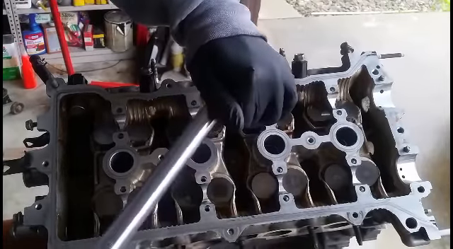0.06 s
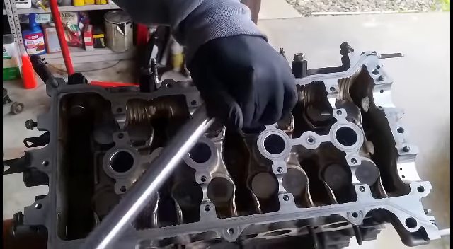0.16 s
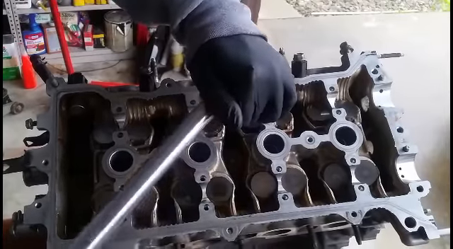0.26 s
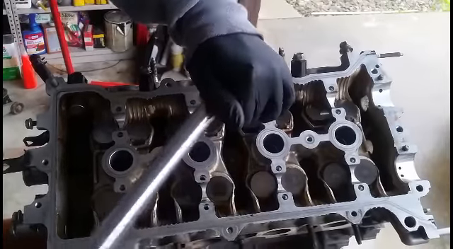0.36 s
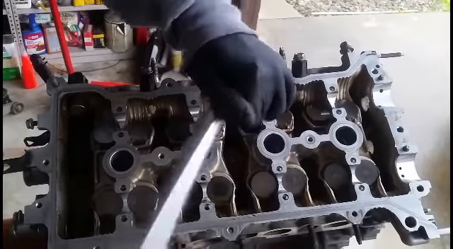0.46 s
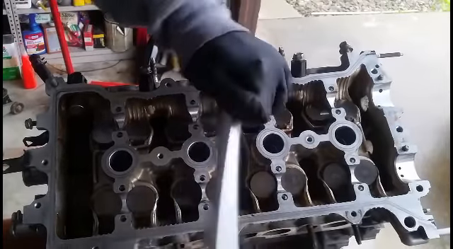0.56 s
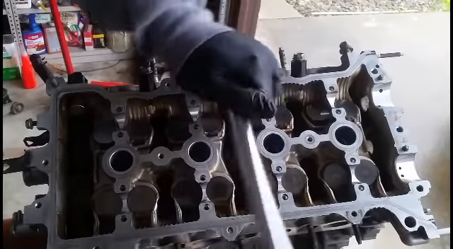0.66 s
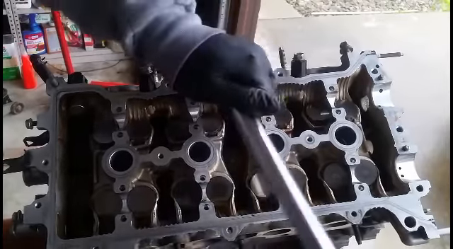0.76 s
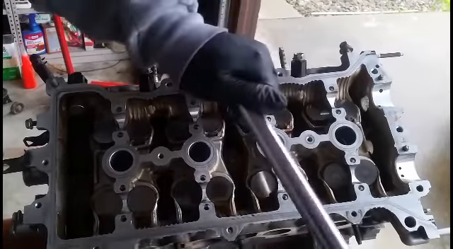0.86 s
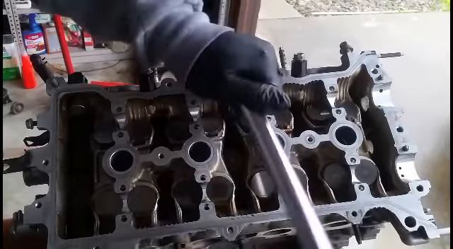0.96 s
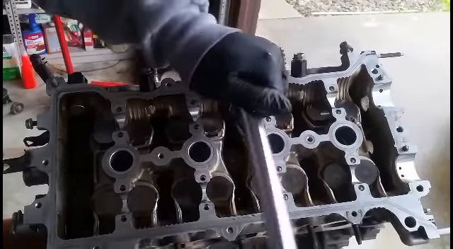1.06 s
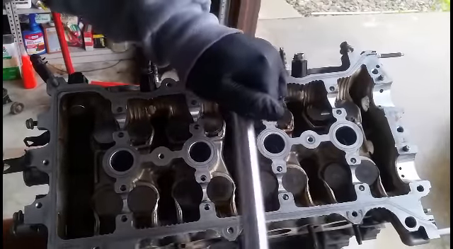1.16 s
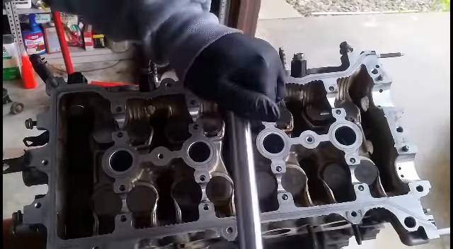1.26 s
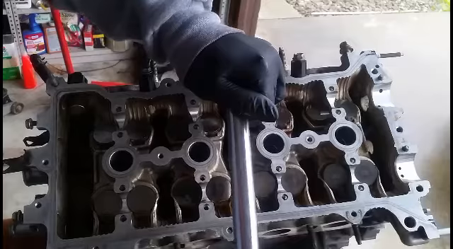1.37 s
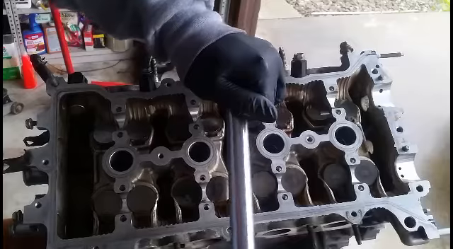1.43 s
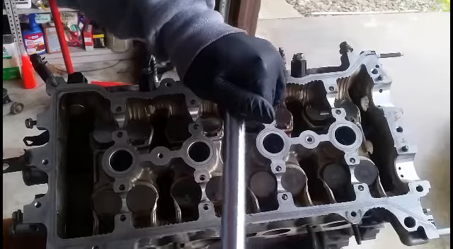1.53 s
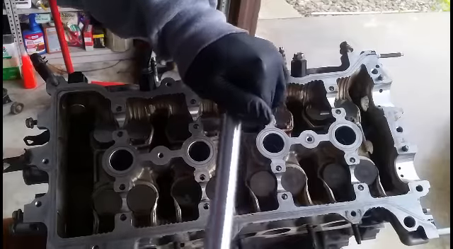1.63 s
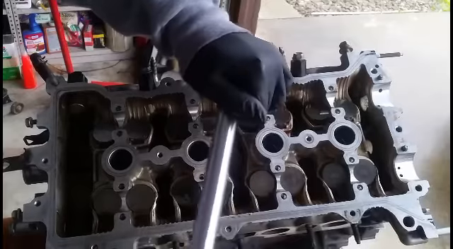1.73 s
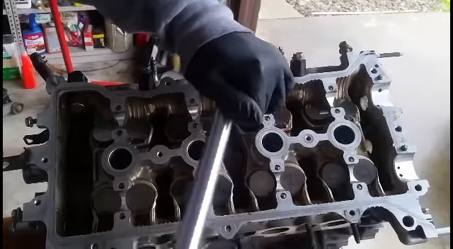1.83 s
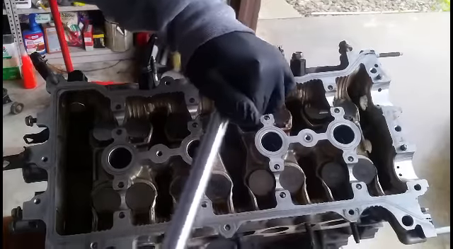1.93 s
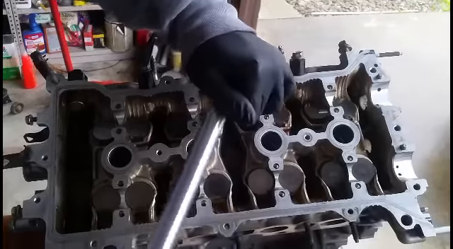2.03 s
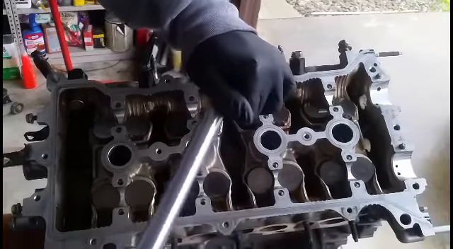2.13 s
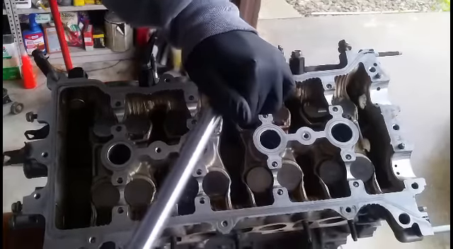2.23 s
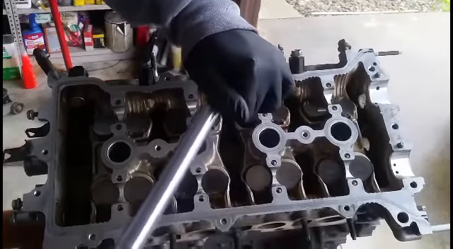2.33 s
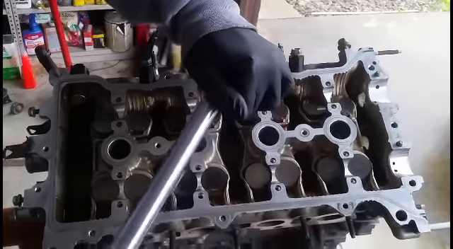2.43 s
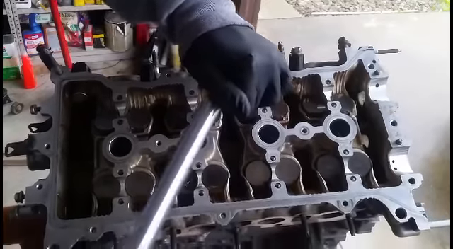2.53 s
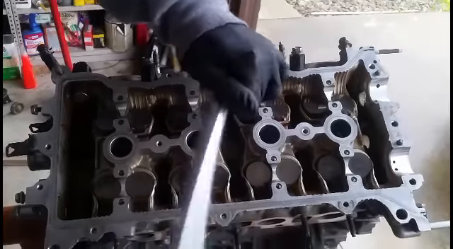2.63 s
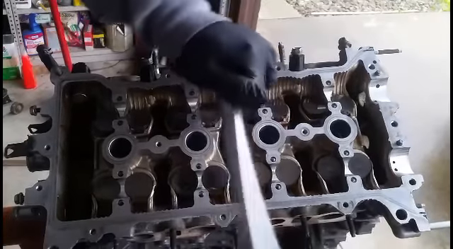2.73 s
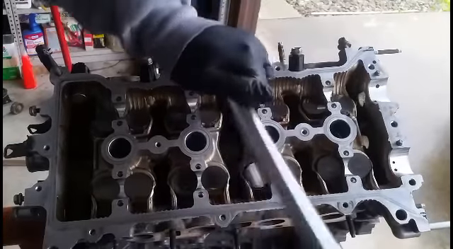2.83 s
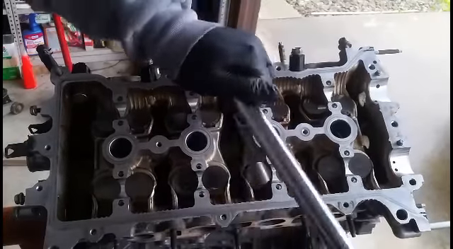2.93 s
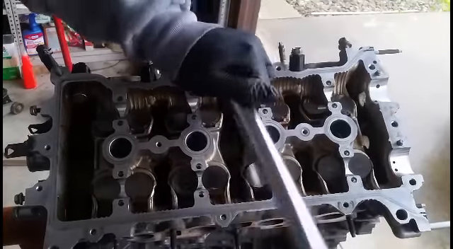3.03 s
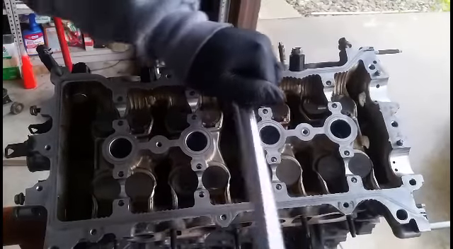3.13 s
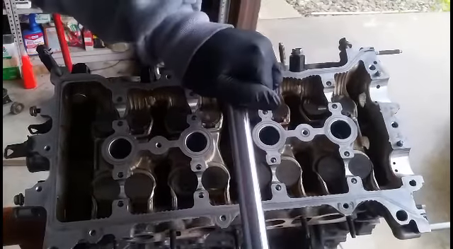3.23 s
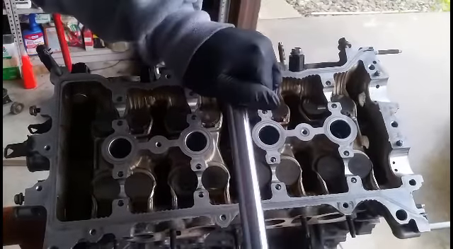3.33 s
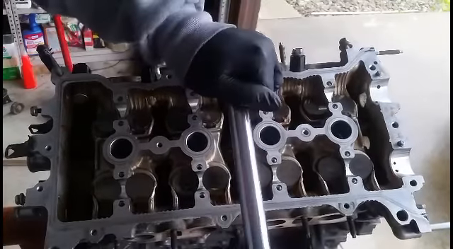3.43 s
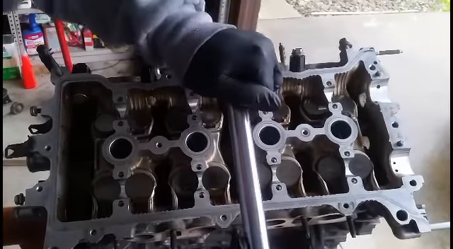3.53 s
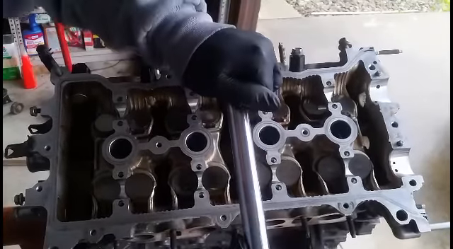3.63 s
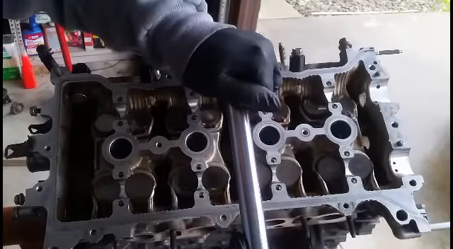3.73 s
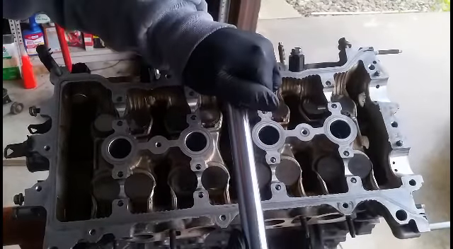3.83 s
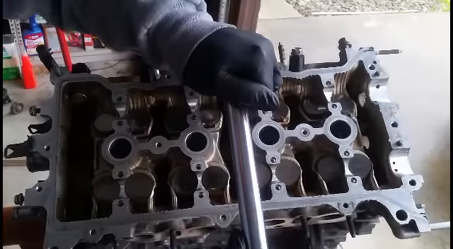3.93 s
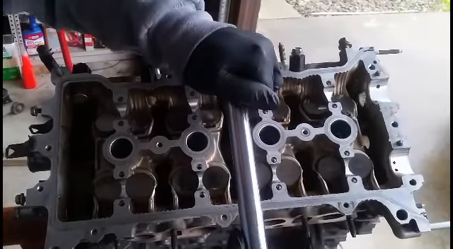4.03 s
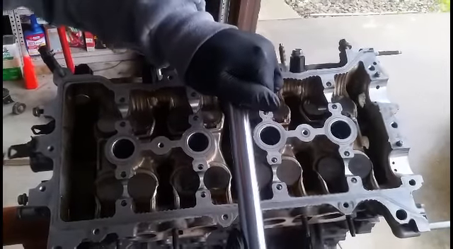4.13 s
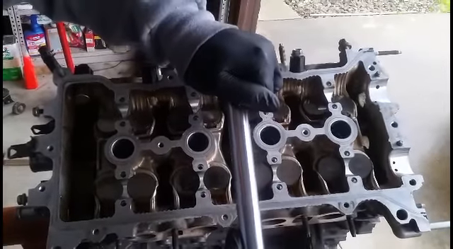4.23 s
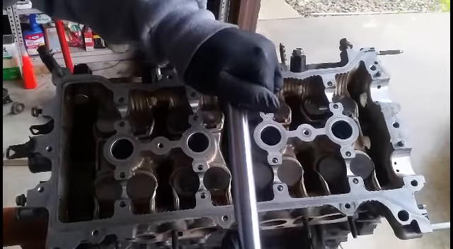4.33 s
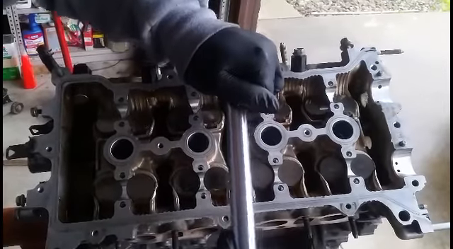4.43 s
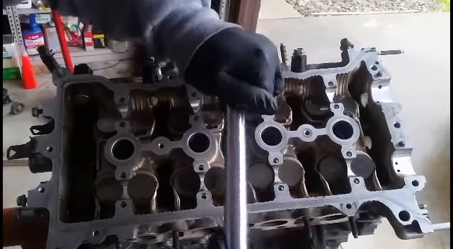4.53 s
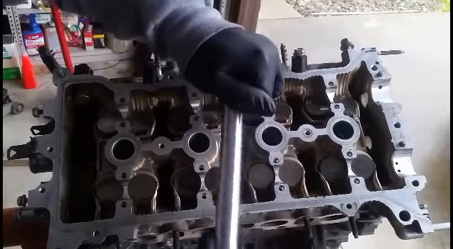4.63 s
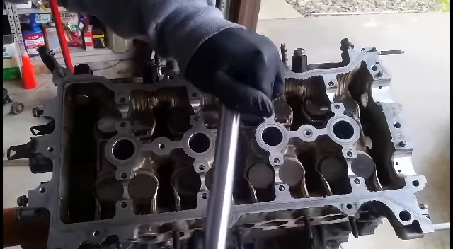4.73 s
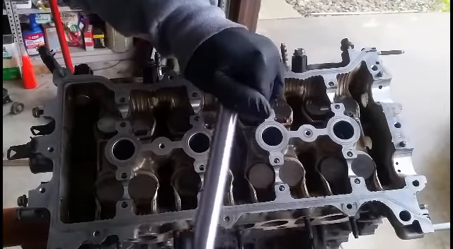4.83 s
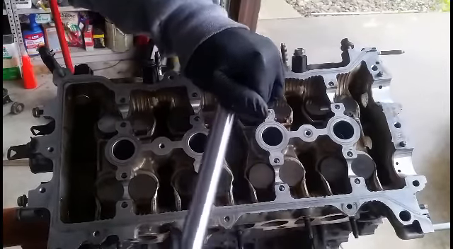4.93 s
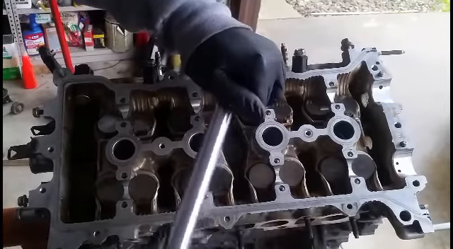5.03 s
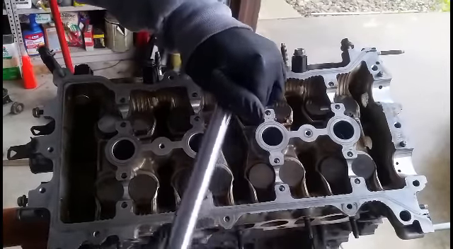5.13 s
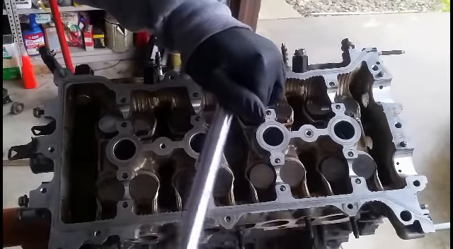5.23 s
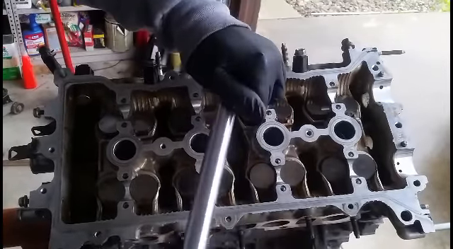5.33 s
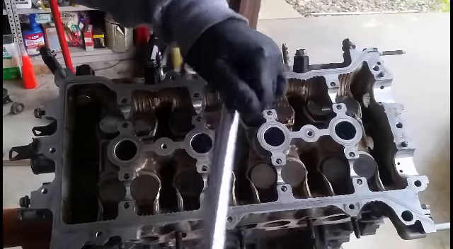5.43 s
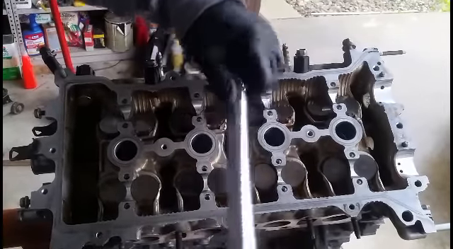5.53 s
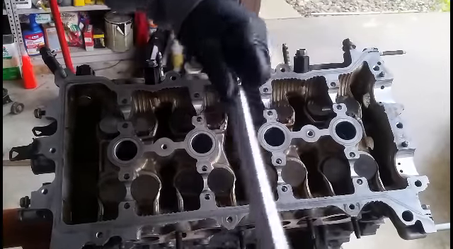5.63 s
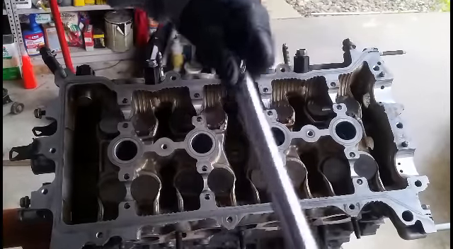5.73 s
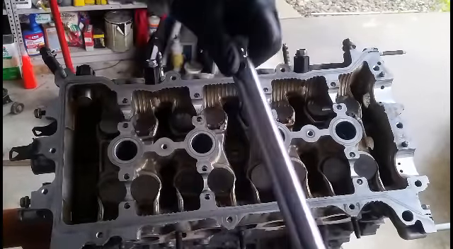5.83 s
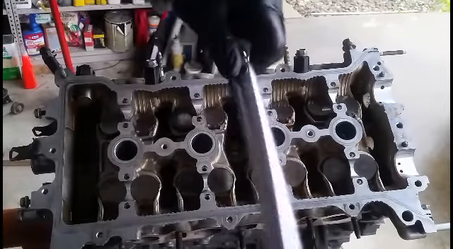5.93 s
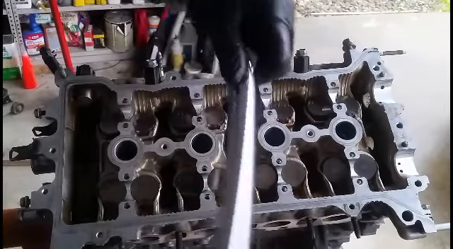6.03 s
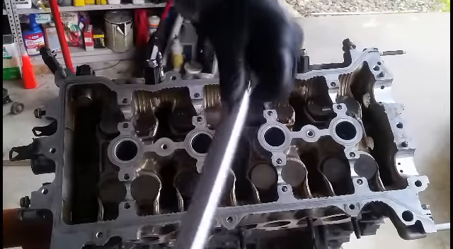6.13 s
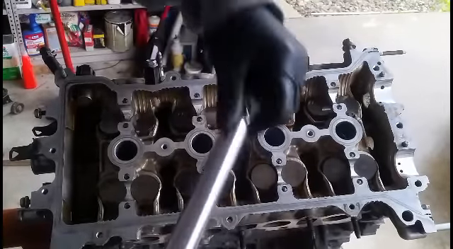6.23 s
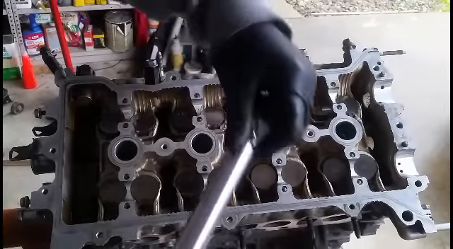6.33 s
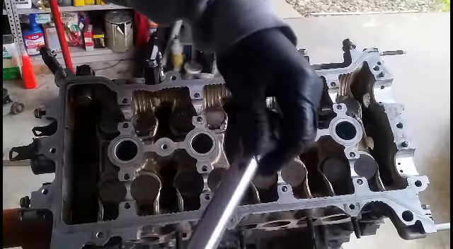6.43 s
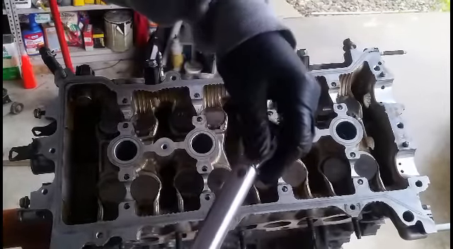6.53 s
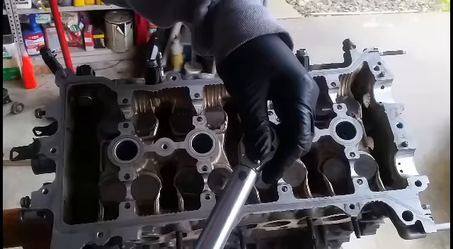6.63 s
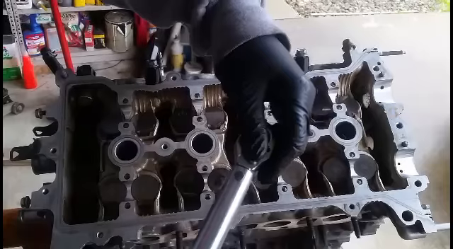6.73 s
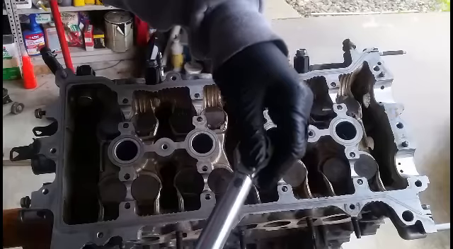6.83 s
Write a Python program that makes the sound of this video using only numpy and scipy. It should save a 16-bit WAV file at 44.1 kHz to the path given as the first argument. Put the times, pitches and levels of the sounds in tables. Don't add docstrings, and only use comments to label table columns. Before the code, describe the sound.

Close up in an open garage, a socket knocks on an engine block and a ratchet chatters in a fast bright burst. After a quieter pause comes a firm knock and a second, shorter burst, then light taps and dull thuds. Two sharp steel snaps follow, the first leaving a thin ring, and a last clack as the socket comes off. Low rumble, faint motor drone and breathing hiss lie behind.

```python
import sys
import numpy as np
from scipy import signal
from scipy.fft import irfft, next_fast_len
from scipy.io import wavfile
from scipy.ndimage import uniform_filter1d

SR = 44100
rng = np.random.default_rng(int(sys.argv[2]) if len(sys.argv) > 2 else 0)


def persist_wave(psi):
    counts = np.round(np.clip(psi, -1, 1) * 32767).astype(np.int16)
    wavfile.write(sys.argv[1], SR, np.atleast_2d(counts).T)


def elevation(decibels):
    levels = np.asarray(decibels, float)
    return 10 ** (levels / 20)


N = 303849
T = np.arange(N) / SR


def on_log(hz, table, column=1):
    table = np.array(table)
    return np.interp(np.log(hz), np.log(table[:, 0]), table[:, column])


def decay(t, t60_s):
    return np.exp(-np.log(1000) * t / t60_s)


def lean(left_minus_right_db):
    return elevation(np.array([[left_minus_right_db], [-left_minus_right_db]]) / 2)


def add(out, x, s):
    i = int(s * SR)
    out[:, i:i + x.shape[1]] += x[:, :N - i]


def walk(rate_hz):
    k = int(SR / rate_hz)
    held = np.repeat(rng.standard_normal(N // k + 1), k)
    return 1.3 * uniform_filter1d(uniform_filter1d(held, k), k)[:N]


def passband(x, lo_hz, hi_hz):
    sos = signal.butter(3, [lo_hz, min(hi_hz, SR / 2.2)], "band", fs=SR, output="sos")
    return signal.sosfilt(sos, x) * np.sqrt(SR / 2 / (hi_hz - lo_hz))


def band(size, hz, colour=None):
    f = np.maximum(np.arange(size // 2 + 1) * SR / size, 1)
    shape = np.cos(np.pi / 2 * np.clip(2 * np.log2(f / hz), -1, 1))
    if colour:
        shape = shape * elevation(on_log(f, colour))
    inside = shape > 1e-9
    spectrum = np.zeros((2, len(f)), complex)
    spectrum[:, inside] = shape[inside] * np.exp(2j * np.pi * rng.random((2, inside.sum())))
    x = irfft(spectrum, size)
    return x / x.std(), np.sum(shape ** 2)


# time_s, level_db
GAIN = [(0.0, -75.5), (0.71, -70), (0.86, -64.5), (1.44, -69.5), (2.44, -76), (2.76, -70), (2.97, -66.5),
        (3.68, -64.5), (4.47, -70.5), (5.08, -71.5), (5.28, -77), (5.43, -84), (5.66, -86), (6.1, -85),
        (6.47, -73), (6.89, -65.5)]


def gain_db():
    db = np.interp(T, *np.transpose(GAIN))
    return db - db.mean()


# mean_db, follow_db per dB of gain, lift_share 0-1
LAYERS = [
    (-59, 0.53, 0.056),
    (-67, 0.7554, .1),
    (-73, 0.9, 0.033),
    (-82, 0.46, 0.82),
]
# start_s, hold_s, lift_db, release_db_per_s
SWINGS = [
    (.62, .45, 8, 26.5),
    (2.776, .3, 12, 13.5),
]


def background_db():
    attack_s = 0.065
    lift = 0
    for s, hold, db, release_db_s in SWINGS:
        rise = db * (T - s) / attack_s
        fall = db - release_db_s * (T - s - attack_s - hold)
        lift = lift + np.clip(np.minimum(rise, fall), 0, db)
    return np.array([db + follow * gain_db() + share * lift for db, follow, share in LAYERS])


LAYER_HZ = (100, 900, 4200, 12500)
# freq_hz, density_db per Hz
RUMBLE_COLOUR = [(15, -49), (25, -23), (48, -3), (86, -4), (119, -3), (155, -8), (226, -14), (258, -19),
                 (450, -27), (580, -57), (990, -120)]
# freq_hz, density_db per Hz
AIR_COLOUR = [(120, -29), (200, -1), (304, -7.5), (427, -12.5), (463, -10.5), (581, -15), (802, -9),
              (1460, -13.5), (2450, -29), (2780, -24), (3320, -25.5), (4300, -15.5), (4820, -21),
              (5950, -44), (9500, -50), (12400, -79.5), (20900, -120)]
# freq_hz, density_db per Hz
HISS_COLOUR = [(4120, -53), (7000, -18.5), (8520, -14), (9440, -24.5), (10200, -8.5), (11300, -1),
               (12300, 1), (13000, -4.5), (13600, -8.5), (15500, -10)]
# freq_hz, likeness 0-1
AIR_LIKE = [(60, 0.87), (200, 0.6), (350, 0.3), (700, 0.9), (1500, 0), (12000, 0.1)]
# freq_hz, left_minus_right_db
AIR_BALANCE = [(60, 1.5), (110, 0.5), (200, 4.5), (380, 0.5), (700, 9.5), (1290, 10.5), (2380, 7.5),
               (4400, 12.5), (8120, 3), (15000, 6.5)]


def air():
    levels = background_db()
    mean = levels.mean(axis=1)
    swing = levels - mean[:, None]
    centres = 28 * 2 ** np.arange(0, 9.6, .5)
    size = next_fast_len(N)
    place = np.interp(np.log(centres), np.log(LAYER_HZ), np.arange(4))
    layer = np.round(place).astype(int)
    colours = RUMBLE_COLOUR, AIR_COLOUR, AIR_COLOUR, HISS_COLOUR
    bands, power = zip(*(band(size, hz, colours[k]) for hz, k in zip(centres, layer)))
    power = np.array(power)
    share = power / [np.sum(power[layer == k]) for k in layer]
    out = 0
    for hz, (a, b), p, home, w in zip(centres, bands, place, layer, share):
        k = min(int(p), 2)
        db = (k + 1 - p) * swing[k] + (p - k) * swing[k + 1] + mean[home]
        like = np.clip(on_log(hz, AIR_LIKE), 0, 1)
        pair = np.array([a, like * a + np.sqrt(1 - like ** 2) * b])[:, :N]
        trim_db = 4.5 if hz < LAYER_HZ[1] / 3 else 1.5
        level = elevation(db + 1.2 * walk(9) + trim_db)
        out = out + np.sqrt(w) * level * lean(on_log(hz, AIR_BALANCE)) * pair
    return out


# time_s, pitch_hz, level_db
DRONE = [(2.549, 96.1, -62.5), (2.75, 94.2, -53), (3.15, 93.4, -48.5), (4.1, 93.3, -47), (4.649, 95.2, -57),
         (4.95, 95.1, -54), (5.6, 96.1, -74.5), (6.25, 97.3, -55.5), (6.399, 97.6, -64), (6.89, 99.3, -57)]


def hums():
    s, hz, db = np.transpose(DRONE)
    turns = np.cumsum(np.interp(T, s, hz)) / SR
    drone_level = elevation(np.interp(T, s, db, left=-80) + 1.6 * walk(14))
    drone = drone_level * np.sin(2 * np.pi * turns + 0.15 * walk(5.6))
    mains_hz, mains_db = 120.7, -62
    mains_level = elevation(mains_db + 0.35 * gain_db() + 2.5 * walk(9.0))
    mains = mains_level * np.sin(2 * np.pi * mains_hz * T + 0.44 * walk(6.9))
    return np.sqrt(2) * (drone + mains) * lean(1.6)


# time_s, level_db
CREAK = [(2.2, -91.5), (2.35, -85), (2.6, -73.5), (2.85, -83), (3.0, -90)]


def creak():
    hz, half_width_hz = 2000, 45
    db = np.interp(T, *np.transpose(CREAK), left=-120, right=-120)
    squeal = passband(rng.standard_normal((2, N)), hz - half_width_hz, hz + half_width_hz)
    return elevation(db + 2.7 * walk(6.4)) * squeal


# low_hz, high_hz
GLOVE_HZ = (9600, 15300)
# peak_s, length_s, hiss_db, body_db
RUSTLES = [
    (1.094, 0.089, -69.5, -72),
    (3.133, 0.087, -64.5, -64.5),
    (3.482, 0.057, -62.5, -62.5),
    (3.579, 0.054, -76, -57.5),
    (6.027, .06, -79.5, -87),
]


def rustles():
    out = np.zeros((2, N))
    t = np.arange(SR // 2) / SR
    for s, length, hiss_db, body_db in RUSTLES:
        flutter = 14.6 * uniform_filter1d(rng.standard_normal(len(t)), 225)
        grain = rng.standard_normal((2, 2, len(t))) * elevation(2.5 * flutter)
        swell = (t / length) * np.exp(1 - t / length)
        hiss = elevation(hiss_db) * passband(grain[0], *GLOVE_HZ)
        body = elevation(body_db) * passband(grain[1], 320, 2160)
        add(out, swell ** 2 * (hiss + body), s - length)
    return out


def strike(modes, lo_hz, hi_hz, crack_s, crack_db=1.0, scatter_db=2.0, detune=.015):
    t = np.arange(SR // 16) / SR
    hz, db, t60 = np.transpose(modes)[:, :, None]
    hz = hz * (1 + detune * rng.standard_normal(hz.shape))
    gain = elevation(db + scatter_db * rng.standard_normal((2,) + hz.shape))
    phase = 2 * np.pi * (hz * t + rng.random((2,) + hz.shape))
    ring = np.sum(gain * decay(t, t60) * np.sin(phase), axis=1)
    grit = passband(rng.standard_normal((2, len(t))), lo_hz, hi_hz) * decay(t, crack_s)
    onset = (1 - np.exp(-t / (.03 * crack_s))) ** 2
    x = (ring + elevation(crack_db) * grit) * onset
    return x / np.sqrt(np.mean(np.max(np.abs(x), axis=1) ** 2))


# pitch_hz, level_db, t60_s
BLOCK = [(1036, -11, 0.041), (1158, -13, 0.02), (1424, -6.5, 0.038), (1822, -5.5, 0.03),
         (2035, -9.5, 0.027)]
# pitch_hz, level_db, t60_s
THUD = [(218, -5.5, 0.11), (285, 1, 0.079), (386, -4.5, 0.1), (459, -4, 0.085)]
# pitch_hz, level_db, t60_s
SHAFT = [(3600, -9, .016), (4202, -10, 0.01), (4840, -25.5, 0.055), (5310, -13, 0.035), (6600, -10, 0.013)]
# time_s, knock_peak_db, pitch_hz, thud_db, shaft_db
KNOCKS = [
    (0.574, -45.5, 1155, -55, -73),
    (1.192, -41, 1355, -51, -63),
    (2.733, -36, 1158, -45.5, -68),
    (2.744, -45, 270, -65, -48),
    (3.225, -49.5, 1380, -51.5, -61),
    (4.034, -62, 393, -40.5, -72),
    (4.059, -65, 427, -44.5, -63),
    (5.077, -40, 1430, -53.5, -41),
    (5.357, -39.5, 1450, -60, -30),
    (6.669, -35, 1020, -50, -35.5),
]


def knocks():
    out = np.zeros((2, N))
    for s, knock_db, hz, thud_db, shaft_db in KNOCKS:
        block = strike(BLOCK + [(hz, -4.5, .04)], 500, 1790, 0.028, crack_db=3.0, detune=.03)
        thud = strike(THUD, 200, 1150, 0.05, crack_db=4.0)[0]
        shaft = strike(SHAFT, 2400, 4946, .025, crack_db=8.0)
        blow = elevation(knock_db + 3.5) * block + elevation(thud_db + 0.5) * thud + elevation(shaft_db - 2.5) * shaft
        add(out, blow * lean(9), s - .001)
    return out


# pitch_hz, level_db, t60_s
RING = [(10000, -19, 0.031), (10430, -20.5, 0.042), (12340, -9, 0.037), (12600, -16.5, 0.02),
        (13200, -19.5, .025), (15100, -20, 0.016)]


def steel(events, ring_db, crack_db, crack_s, low_hz, shaft_db, block_db, grit_db, grit_s):
    head_hz, head_spread = 12190, .012
    out = np.zeros((2, N))
    for s, peak_db, body_db, pan_db in events:
        hz = head_hz * (1 + head_spread * rng.standard_normal())
        head = strike(RING + [(hz, 1.5, .012)], low_hz, 15500, crack_s, crack_db=crack_db)
        shaft = strike(SHAFT, 2626, 7400, grit_s, crack_db=12.0 + grit_db, scatter_db=4.5, detune=.05)
        block = strike(BLOCK, 390, 2800, grit_s, crack_db=-3.5 + grit_db, scatter_db=4.0, detune=.04)
        blow = elevation(peak_db + ring_db) * head
        blow = blow + elevation(body_db + shaft_db) * shaft
        blow = blow + elevation(body_db + block_db) * block * lean(5)
        add(out, blow * lean(pan_db), s - .0004)
    return out


# time_s, ring_peak_db, body_db, left_minus_right_db
RELEASES = [
    (5.0769, -24, -43, -1.5),
    (5.0814, -19.5, -37.5, 1.5),
    (5.3572, -24.5, -46.5, 1.5),
    (5.3624, -40, -55, 7.5),
    (6.6687, -28, -40, 3),
    (6.6804, -38, -63, 0.5),
]


def release():
    return steel(RELEASES, ring_db=2.5, crack_db=3.0, crack_s=0.0099, low_hz=9300, shaft_db=6.5, block_db=2.0,
                 grit_db=14.0, grit_s=0.024)


def handle():
    hz, level_db, t60_s = 4880, -59.5, 0.67
    age = np.maximum(T - RELEASES[1][0], 0)
    ring = decay(age, t60_s) * np.sin(2 * np.pi * hz * age)
    return elevation(level_db) * ring * np.array([[1.4], [.6]])


# time_s, ring_peak_db, body_db, left_minus_right_db
TEETH = [(0.6924, -34, -48, 3.5), (0.6958, -24.5, -49.5, -4), (0.7422, -23.5, -56, -6),
         (0.7464, -26, -44, 4.5), (0.7751, -14, -44, -2.5), (0.778, -24, -55, -5.5),
         (0.7804, -37, -54, -1.5), (0.8101, -12, -41.5, 5.5), (0.816, -29.5, -47, -3),
         (0.8204, -35, -56, -1.5), (0.8604, -23.5, -41, 7.5), (0.8634, -21.5, -43.5, -4.5),
         (0.8674, -20, -50.5, -2.5), (2.8374, -24.5, -46.5, 8.5), (2.8434, -43.5, -49.5, 7),
         (2.8704, -22.5, -46, -10), (2.8764, -41, -54, 24), (2.9128, -18.5, -42, -2.5),
         (2.9174, -25.5, -49, 14), (2.9684, -31.5, -52, -9), (2.9726, -18, -39, 2),
         (2.9784, -32.5, -48, 11)]
# time_s, ring_peak_db, body_db, left_minus_right_db
RATTLES = [(0.6534, -56, -62, 4), (1.1922, -46.5, -71, 3), (1.2461, -45, -69, 5), (1.8003, -48.5, -69, 0),
           (2.7345, -53.5, -66, 3), (3.2316, -43, -50.5, 3), (3.2725, -52, -66, 11),
           (5.7109, -65, -74, -0.6), (5.8267, -58, -62.5, 1)]


def pawl():
    teeth = steel(TEETH, ring_db=-0.6, crack_db=-2.0, crack_s=0.013, low_hz=7800, shaft_db=7.0, block_db=2.0,
                  grit_db=-2.0, grit_s=.03)
    play = steel(RATTLES, ring_db=0.6, crack_db=4.0, crack_s=0.011, low_hz=9100, shaft_db=-2.0, block_db=6.0,
                 grit_db=3.5, grit_s=0.037)
    return teeth + play


# freq_hz, gain_db
PORT = [(4500, 0.5), (5500, 0), (6200, -11.5), (7200, -9.5), (9000, -16.5), (9750, 2.5), (15200, 1.5),
        (15700, -15.5), (16600, -41.5)]


def port(x):
    f = np.linspace(0, SR / 2, 129)
    taps = signal.firwin2(127, f, elevation(on_log(np.maximum(f, 1), PORT)), fs=SR)
    return signal.fftconvolve(x, taps[None], mode="same", axes=1)


# freq_hz, t60_s, level_db
ROOM = [(300, 0.343, -2.5), (1000, 0.35, -8), (3380, 0.29, -3), (6700, .3, -16), (12000, 0.25, -13.5)]


def garage(x):
    size = SR // 2
    t = np.arange(size) / SR
    tail = 0
    for hz in 160 * 2 ** np.arange(0, 7, .5):
        fade = decay(t, on_log(hz, ROOM)) * np.minimum(t / 0.0032, 1)
        level = elevation(on_log(hz, ROOM, column=2)) * np.sqrt(hz / SR / np.sum(fade ** 2))
        tail = tail + level * fade * band(size, hz)[0]
    return signal.fftconvolve(x, tail, axes=1)[:, :N]


def scene():
    near = port(pawl() + knocks() + rustles())
    snap = port(release())
    room = garage(near + elevation(6) * snap)
    return near + snap + handle() + room + creak() + air() + hums()


def top_cut(x):
    return signal.sosfilt(signal.butter(12, 16650, fs=SR, output="sos"), x)


def record(dry):
    ports = np.array([np.roll(dry[0], 8), dry[1]])
    mix = signal.sosfilt(signal.butter(8, 15900, fs=SR, output="sos"), ports)
    return top_cut(mix)


dry = scene()
out = record(dry)
persist_wave(out)
```